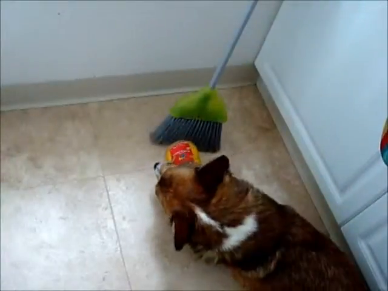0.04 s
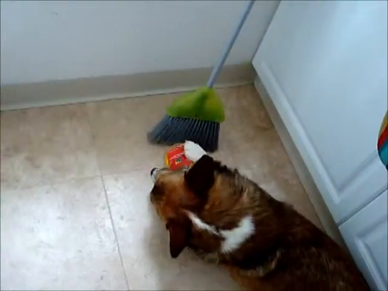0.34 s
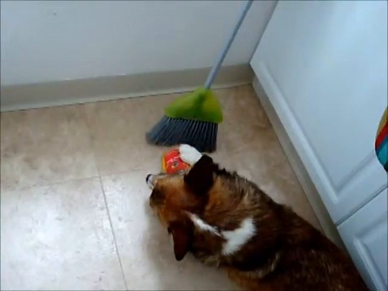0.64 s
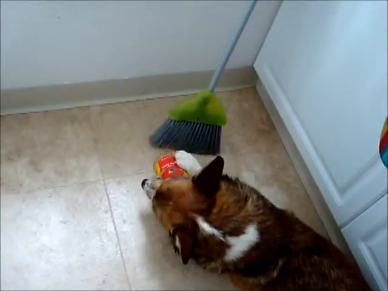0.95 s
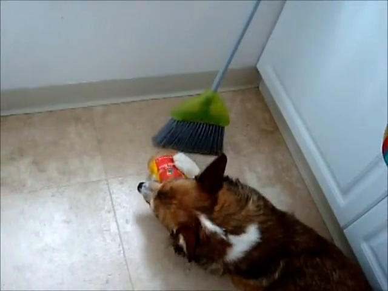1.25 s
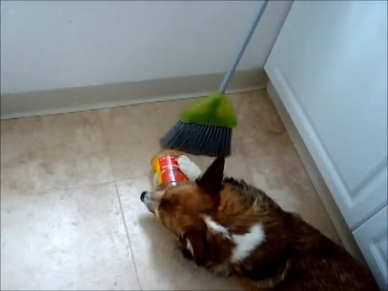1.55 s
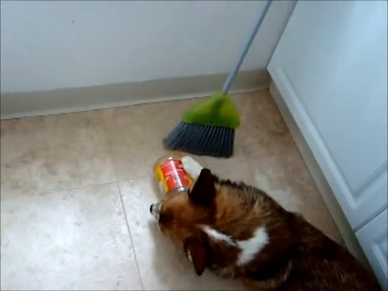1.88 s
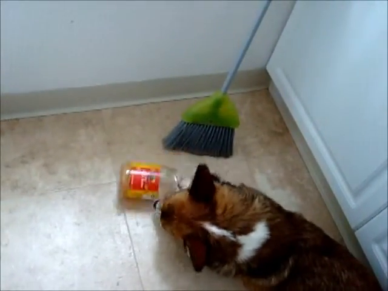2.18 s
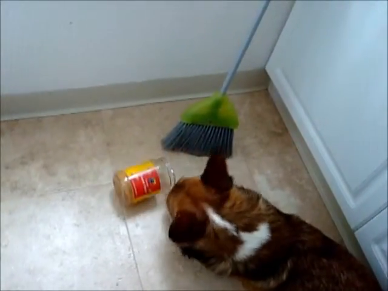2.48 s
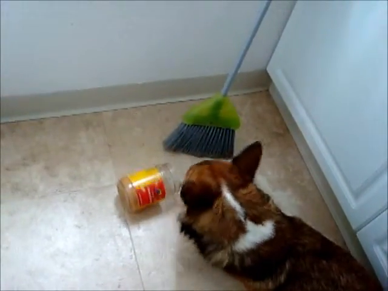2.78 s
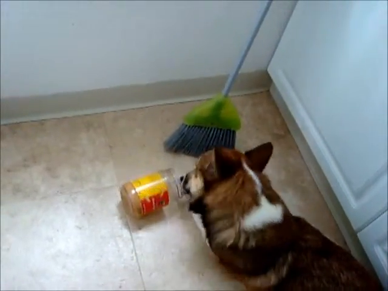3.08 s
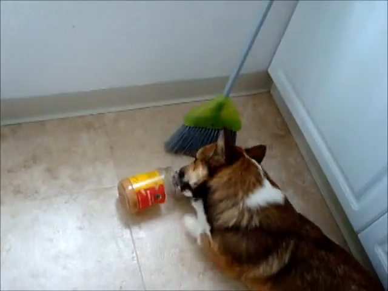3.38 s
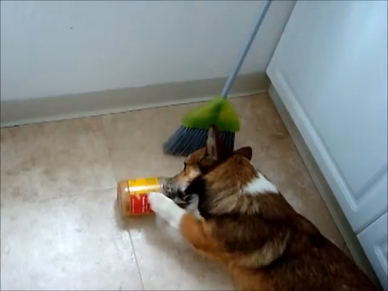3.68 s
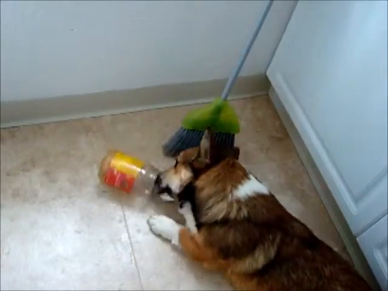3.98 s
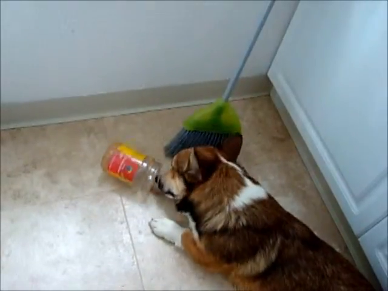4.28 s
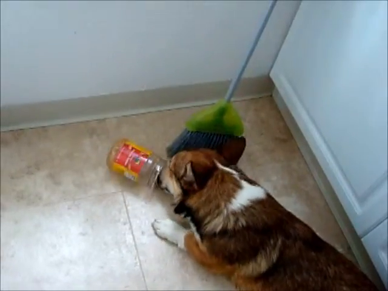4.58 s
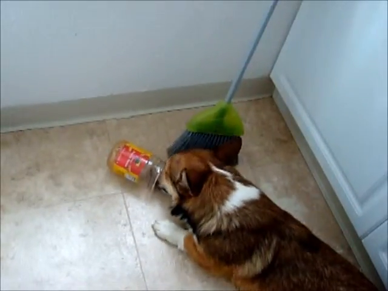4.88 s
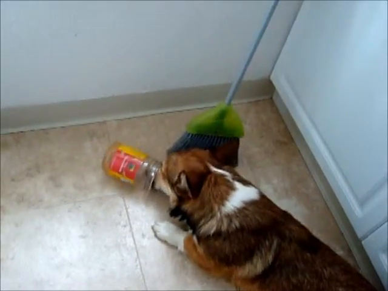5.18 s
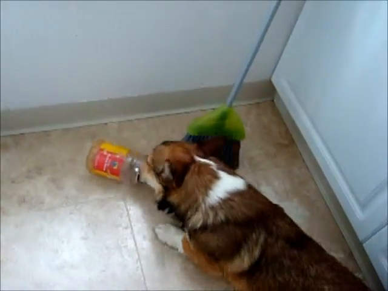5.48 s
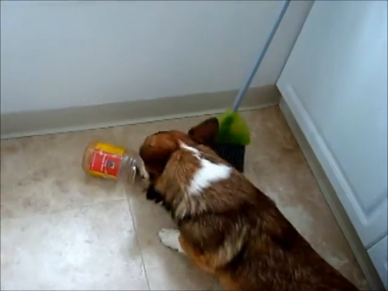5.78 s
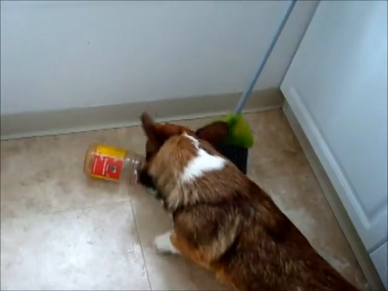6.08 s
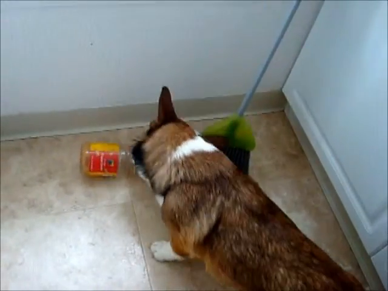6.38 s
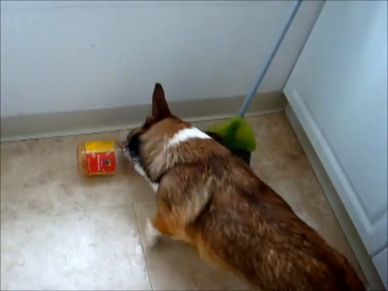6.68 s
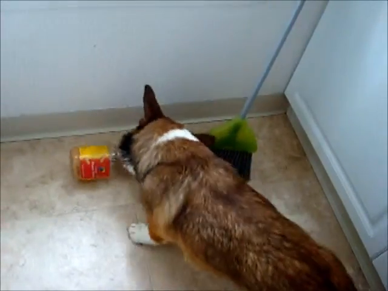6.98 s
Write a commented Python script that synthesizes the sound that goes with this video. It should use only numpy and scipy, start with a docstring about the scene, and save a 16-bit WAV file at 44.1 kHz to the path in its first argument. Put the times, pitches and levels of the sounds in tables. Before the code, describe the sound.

An empty plastic jar clacks lightly and scrapes on a tiled kitchen floor at about 0.3 seconds as a dog works at it. From 1.1 seconds, pinned by a paw, it gives dull, hollow knocks, stronger around 1.5 and loudest at 1.9. It slips free and skitters with sharp clacks and scrapes from 2.1 to 2.4 seconds. After a lull and a faint tick, the muzzle makes two tiny squeaks on the plastic near 3.4 seconds. Another clatter comes between 3.8 and 4.2, with a short roll, then a few soft taps until 5. From about 5.5 seconds to the end at 7, the jar rolls in short nudges with a hollow rumble and low bumps, strongest near 6.8 and mixed with light clacks. One microphone hears it from behind the dog, the small hard room ringing briefly over a faint steady hiss.

```python
"""An empty plastic jar clacks and skitters on a tiled kitchen floor as a dog works at it. Pinned by a
paw, it knocks dully; it slips free, scrapes, squeaks and clacks; then the muzzle closes its mouth and
it rolls with a hollow rumble. Each blow and rub rings the jar's thin wall. One microphone hears it
from behind the dog's body, with the small hard room ringing briefly over a steady hiss."""
import sys
import numpy as np
from scipy import signal
from scipy.fft import rfft, irfft
from scipy.io import wavfile

SR = 44100
rng = np.random.default_rng(int(sys.argv[2]) if len(sys.argv) > 2 else 0)


def put_to_file(sound):
    """Save the sound as 16-bit audio at rate SR, in the file named by the first command-line argument."""
    columns = np.atleast_2d(sound).T  # one column per channel
    safe = np.clip(columns, -1, 1)
    whole_steps = np.round(safe * 32767)
    wavfile.write(sys.argv[1], SR, whole_steps.astype(np.int16))


N = 310905


def free_jar():
    """The loose jar scrapes, squeaks and clacks against claws, teeth and tile."""
    # Hard hits. Each row: start in seconds, relative level in dB, brightness in dB per octave,
    # contact time in seconds, tone of the struck spot in Hz, its gain in dB.
    clacks = [(.2905, -1, -3, 0.0062, 1010, 5), (.327, -8, -1, 0.0069, 2740, 8),
              (.372, -12.5, 4.5, .004, 3100, -4), (.4165, -1.5, -2, 0.0067, 4630, 6),
              (2.138, 2.5, -1.5, 0.0036, 1010, 4), (2.15, 4.5, -1, 0.0098, 1020, 8),
              (2.164, 6, -1.5, 0.0053, 4940, 5), (2.202, 14, 2.94, 0.0061, 3020, -9),
              (2.219, 3, 1.5, 0.0027, 4205, -2), (2.247, 3, -3.5, 0.0016, 4800, 4),
              (3.107, -19, -3.5, 0.0014, 1120, 10), (3.826, -8, -3, 0.003, 2360, 9),
              (3.86, -8, -2, .004, 2360, 1), (3.875, -8.5, -1.5, .0055, 1030, 6),
              (3.924, -6, -2.7, 0.0022, 2180, 14), (3.951, 2.5, 0.5, 0.0039, 4430, 9),
              (3.983, 6, 3.5, 0.0043, 3030, -12), (3.993, 0, -0.5, 0.018, 3470, 7),
              (4.174, -5.5, -4, 0.0089, 2350, -9), (4.483, -9.5, -7, 0.0019, 1210, 10),
              (4.554, -15.5, -2, 0.0019, 960, 7), (4.958, -18.5, -3.5, 0.0036, 1950, 12),
              (5.737, -10.5, -1, 0.0031, 3500, -3), (6.236, -17, 3, .0049, 4700, 0),
              (6.645, -14, 3, 0.0023, 2220, -6), (6.702, -5, -5.5, 0.0021, 1160, 2),
              (6.735, -11.5, 1.5, 0.0023, 3240, -10), (6.807, -8, -4, 0.0038, 2300, 13),
              (6.927, -4.5, 2.6, 0.0063, 4230, 4.5), (6.957, -3, -2, 0.0028, 990, 10)]
    # Short rasps: slides on the tile and, at 1.922 s, a brief rush of noise just before the loudest knock.
    # Each row: start in seconds, seconds until the fade, relative level in dB, brightness in dB per octave.
    rasps = [(.29, 0.056, -27.5, 0.7), (.36, 0.032, -31.5, 3), (.42, 0.028, -28.5, -0.7),
             (.96, 0.053, -35.5, -2), (1.85, 0.054, -29, 0), (1.922, .015, -17, -3),
             (2.05, 0.068, -33, 0.5), (2.125, 0.083, -22.5, -0.5), (2.22, 0.082, -26.5, 0.5),
             (2.3, 0.073, -32.5, -.5), (3.47, 0.13, -36.5, 0), (3.85, 0.052, -32.5, 2.5),
             (3.905, 0.098, -23, 2.2), (4.03, 0.19, -39.5, 3)]
    # Clacks are light and hard; rasps have little top. Each row: frequency in Hz, gain in dB.
    clack_colour = [(350, -9.5), (1000, 0), (2500, 0.5), (6200, -7.5)]
    rasp_colour = [(350, 1.5), (1000, -1), (2500, 0.5), (6200, -15)]
    # The loose wall's broad response. Each row: frequency in Hz, gain in dB.
    wall = [(30, -30), (90, -9.5), (200, -2.5), (400, 3.5), (700, 1.5), (1000, 0.5), (1600, -1.5),
            (3000, 1.5), (4800, 2.5), (7500, -0.5), (10000, -9)]
    # Its resonances. Each row: frequency in Hz, width in Hz, gain over the broad response in dB.
    modes = [(960, 68, -3.5), (1080, 49, 0), (2070, 45, -1), (2420, 20, 0), (3080, 16, -9), (3500, 76, -8),
             (4830, 31, -23), (4980, 190, -4.5), (5200, 45, -2), (5680, 120, 3), (6740, 36, 1)]
    clacking = colour(blows(clacks, spot_q=8.3), clack_colour)
    rasping = friction(rasps, rise_s=0.012, fall_s=0.039, catches_per_s=2200, spread_db=1, smooth=0.63)
    force = clacking + squeaks() + undb(-7) * colour(rasping, rasp_colour)
    return kitchen(jar(force, wall, modes), early_db=-10.5, early_s=0.01, tail_db=-6, gap_s=0.0028)


def pinned_jar():
    """The paw tips the jar and knocks it on the tile; it rocks back with a weaker, duller bump."""
    # Knocks on the tile. Each row: start in seconds, relative level in dB, brightness in dB per octave,
    # contact time in seconds, tone of the struck spot in Hz, its gain in dB.
    knocks = [(1.121, -13.5, -1.5, .004, 2500, 4), (1.182, -7, -3, 0.0029, 353, 4),
              (1.21, -5.5, -3, 0.0029, 975, 0), (1.243, -12.5, -1.5, 0.0034, 412, 7),
              (1.413, -1, -1.5, 0.003, 2660, 8), (1.4325, 11, -1.5, 0.00208, 900, 5.5),
              (1.554, 15, -0.56, 0.0035, 924, 6.5), (1.9405, 21, 0, .0017, 2750, 4)]
    # Under the paw a knock is heavy and dull. Each row: frequency in Hz, gain in dB.
    knock_colour = [(100, 4), (200, 5), (350, 1), (1000, -0.5), (2500, 0.5), (6200, -11.5)]
    # The pinned wall's broad response. Each row: frequency in Hz, gain in dB.
    wall = [(30, -34), (90, -27), (180, -16), (280, -3), (400, 1), (620, -4), (1000, 0.5), (2100, 0.5),
            (2900, 3), (4500, 3), (7000, -2), (10000, -13.5)]
    # Its resonances. Each row: frequency in Hz, width in Hz, gain over the broad response in dB.
    modes = [(178, 19, 4.5), (377, 13.5, -0.5), (494, 43, 6.5), (610, 30, -10), (749, 61, 6.5),
             (837, 45, 2.5), (924, 10, 7.5), (970, 28, 8.5), (1143, 27, -2), (1450, 27, -7),
             (1855, 110, -5), (2340, 20, -25), (3440, 90, -8), (3770, 85, -3), (5810, 160, 6.5)]
    lag_s, contact_s, spot_hz, spot_db = 0.012, 0.0032, 392, 8.5
    rebounds = [(start_s + lag_s, db - 10, brightness - 1.5, contact_s, spot_hz, spot_db)
                for start_s, db, brightness, *_ in knocks]
    force = undb(-3.5) * colour(blows(knocks + rebounds, spot_q=12.8), knock_colour)
    return kitchen(jar(force, wall, modes), early_db=-5, early_s=0.024, tail_db=-6.5, gap_s=0.002)


def hollow_jar(contact_s=0.0039):
    """The jar bumps with a hollow tone and, later, rolls with the muzzle closing its mouth."""
    # Soft hollow bumps; the first two are the jar rocking back after knocks. Each row: start in seconds,
    # relative level in dB, brightness in dB per octave, tone of the bumped spot in Hz, its gain in dB.
    bumps = [(1.193, 4.5, 0, 354, 11.5), (1.26, 0, 2, 390, 9), (4.487, 0, 1, 326, 11),
             (4.507, -3.5, -2, 375, 12), (4.975, -10, -2, 251, 22), (5.628, 14, 1, 238, 5),
             (5.937, 7.5, 2, 447, 7.5), (6.021, 16.5, 3, 420, -1), (6.052, 14, 3, 724, -11),
             (6.084, 13.5, 2.5, 437, 6), (6.11, 9.5, .5, 452, 9.5), (6.356, 9.5, 1, 257, 10),
             (6.785, 20, -1.5, 420, 10), (6.792, 16.5, -3, 707, 9), (6.807, 17, -1, 500, 7),
             (6.825, 16.5, 0.5, 372, 7), (6.877, -5.5, 2, 410, 19)]
    # Each nudge rolls the jar a little way. Each row: start in seconds, seconds until the fade,
    # relative level in dB, brightness in dB per octave.
    rolls = [(3.98, 0.14, -21.5, 1), (4.12, .12, -27, -1), (5.45, 0.074, -21.5, 0), (5.53, 0.14, -22, -2.5),
             (5.76, 0.098, -23, -0.8), (5.94, .04, -27, -1.5), (6.02, 0.09, -21, .5),
             (6.24, 0.037, -28.5, 5), (6.36, .07, -28, -0.5), (6.43, .14, -23.5, -0.5),
             (6.59, 0.061, -23.5, 1.8), (6.67, 0.11, -21.5, -1.2), (6.96, 0.098, -25.5, 0.5)]
    # A bump only flexes the jar; rolling also drums the floor. Each row: frequency in Hz, gain in dB.
    bump_colour = [(100, -2.5), (230, 3), (310, 0.5), (400, -1), (1000, -5.5), (2500, -24.5), (6200, -31)]
    roll_colour = [(60, -0.5), (140, 11.5), (210, 9.5), (330, -3), (1000, -5), (2500, -16.5), (6200, -20)]
    # The hollow tone's broad response. Each row: frequency in Hz, gain in dB.
    wall = [(30, -32), (90, -21), (140, -24.5), (200, -15.5), (290, -4), (430, -6), (600, -7), (850, -14.5),
            (1400, -6.5), (2300, -5), (5000, -1), (10000, -16)]
    # Its resonances. Each row: frequency in Hz, width in Hz, gain over the broad response in dB.
    modes = [(230.6, 6.7, 7), (393.8, 14, 3.5), (441, 26, 12), (487.6, 13.5, 2.5), (549, 16, -4.5),
             (725.2, 12.8, 20), (963, 26, 11), (2120, 54, -2), (2215, 26, 10), (2790, 60, 2),
             (3570, 40, -12)]
    soft_hits = [(start_s, db, brightness, contact_s, *spot) for start_s, db, brightness, *spot in bumps]
    bumping = colour(blows(soft_hits, spot_q=8), bump_colour)
    rolling = friction(rolls, rise_s=0.015, fall_s=0.067, catches_per_s=700, spread_db=2.5, smooth=0.52)
    force = undb(-2.5) * bumping + undb(-3) * colour(rolling, roll_colour)
    return kitchen(jar(force, wall, modes), early_db=-8.5, early_s=0.019, tail_db=-11, gap_s=0.001)


def squeaks(slips_per_s=130, width_hz=260):
    """The muzzle sticks and slips on the plastic, ringing one spot of the wall."""
    # Muzzle rubs. Each row: start in seconds, length in seconds, relative level in dB, pitch in Hz.
    rubs = [(3.386, .021, -1.5, 2790), (3.474, .005, 0, 3140)]
    force = np.zeros(N)
    for start_s, length_s, db, hz in rubs:
        for slip_s in np.arange(0, length_s, 1 / slips_per_s):
            push, lead = crack(contact_s=0.0024)
            add(force, undb(db) * resonate(push, hz, width_hz), int((start_s + slip_s) * SR) - lead)
    return force


def jar(force, wall, modes):
    """The thin wall answers at once and its modes ring on."""
    push = colour(force, wall)
    return push + sum(undb(db) * resonate(push, hz, width_hz) for hz, width_hz, db in modes)


def blows(hits, spot_q):
    """Firmness sets the brightness of each blow, and the spot that is hit adds its own short tone."""
    force = np.zeros(N)
    for start_s, db, brightness, contact_s, spot_hz, spot_db in hits:
        push, lead = crack(contact_s)
        push = undb(db) * tilt(push, brightness)
        spot_tone = undb(spot_db) * resonate(push, spot_hz, spot_hz / spot_q)
        add(force, push + spot_tone, int(start_s * SR) - lead)
    return force


def crack(contact_s, size=4096, lead=512):
    """The buckling wall spreads a blow over milliseconds; the touch falls `lead` samples in."""
    age = np.arange(size) / SR / contact_s
    buckling = rng.standard_normal(size) * age * np.exp(-2 * age)
    spectrum = rfft(buckling / np.linalg.norm(buckling))
    evenness = along([(700, 1), (1800, 0.3)], size)  # even in the bass, lumpy above
    push = np.roll(irfft(spectrum / np.abs(spectrum) ** evenness), lead)
    # The force builds up quickly and is over within a few contact times.
    since_touch_s = (np.arange(size) - lead) / SR
    push *= np.interp(since_touch_s, [-0.004, 0, 3 * contact_s, 7 * contact_s], [0, 1, 1, 0])
    return push / np.linalg.norm(push), lead


def friction(strokes, rise_s, fall_s, catches_per_s, spread_db, smooth):
    """Many tiny catches of uneven size over a smoother rub; each stroke rises, holds and fades."""
    sizes = undb(spread_db * np.minimum(rng.exponential(size=N), 3))
    catches = (rng.random(N) < catches_per_s / SR) * rng.choice([-1, 1], N) * sizes
    roughness = unit(unit(catches) + smooth * rng.standard_normal(N))
    force = np.zeros(N)
    for start_s, hold_s, db, brightness in strokes:
        start = int(start_s * SR)
        rub = tilt(roughness[start:start + SR // 2], brightness)
        age_s = np.arange(len(rub)) / SR
        rise = np.minimum(age_s / rise_s, 1)
        fade = np.clip(1 - (age_s - hold_s) / fall_s, 0, 1) ** 2
        add(force, undb(db) * rise * fade * rub, start)
    return force


def resonate(x, hz, width_hz):
    """One resonance with gain 1 at its centre."""
    return signal.lfilter(*signal.iirpeak(hz, hz / width_hz, fs=SR), x)


def tilt(x, db_per_octave, low_hz=350, high_hz=6200):
    """Brighten or dull a contact around the middle of its range."""
    swing_db = db_per_octave * np.log2(high_hz / low_hz) / 2
    return colour(x, [(low_hz, -swing_db), (high_hz, swing_db)])


def colour(x, points):
    """Filter by a smooth curve of (Hz, dB) points."""
    return irfft(rfft(x) * undb(along(points, len(x))), len(x))


def split(x, centres_hz):
    """Overlapping bands that add up to the sound again."""
    spectrum = rfft(x)
    weights = [along(list(zip(centres_hz, row)), len(x)) for row in np.eye(len(centres_hz))]
    return [irfft(spectrum * weight, len(x)) for weight in weights]


def along(points, size):
    """Join (Hz, value) points on a log axis and read them at the bins of a sound of this size."""
    hz, value = np.transpose(points)
    return np.interp(np.log(np.fft.rfftfreq(size, 1 / SR) + 1), np.log(hz), value)


def add(track, sound, start):
    """Mix a sound in from this sample on."""
    track[start:start + len(sound)] += sound[:len(track) - start]


def undb(db):
    """Decibels to gain."""
    return 10 ** (np.asarray(db) / 20)


def unit(x):
    """Scale to rms 1."""
    return x / np.sqrt(np.mean(x ** 2))


def kitchen(x, early_db, early_s, tail_db, gap_s):
    """The microphone gets shaded direct sound, echoes from the near corner, then the room's tail."""
    # The dog's body shades the straight path to the microphone. Each row: frequency in Hz, gain in dB.
    shade = [(500, -2), (3500, 0.5), (6000, -1), (10000, 0)]
    # The room's ring. Each row: frequency in Hz, seconds to fall by 60 dB.
    decay_times = [(150, 0.26), (400, 0.49), (1000, 0.41), (2800, 0.34), (7000, 0.38)]
    centres_hz, t60s = np.transpose(decay_times)
    t = np.arange(SR // 2) / SR
    arrival = np.clip(t / gap_s - 1, 0, 1)
    corner = rng.standard_normal(len(t)) * arrival * np.exp(-(t / early_s) ** 2)
    bands = split(rng.standard_normal(len(t)), centres_hz)
    tail = arrival * sum(band * undb(-60 * t / t60) for band, t60 in zip(bands, t60s))
    echoes = undb(early_db) * corner / np.linalg.norm(corner)
    echoes += undb(tail_db) * tail / np.linalg.norm(tail)
    return colour(x, shade) + signal.fftconvolve(x, echoes)[:N]


def background():
    """Steady hiss behind the jar, with two faint whines high up."""
    # The hiss is fullest in the low middle. Each row: frequency in Hz, relative level in dB.
    hiss_colour = [(15, -52), (25, -33), (90, -12.5), (227, -2.5), (271, -1.5), (394, -1), (436, -0.5),
                   (506, -0.5), (1450, -6.5), (2340, -9.5), (3160, -11.5), (3400, -12), (7220, -17),
                   (7780, -18.5), (10000, -19.5), (13000, -94), (22000, -120)]
    hiss = undb(-50.5) * unit(colour(rng.standard_normal(N), hiss_colour))
    return hiss + undb(-65) * whine(hz=7585, width_hz=40) + undb(-73) * whine(hz=7880, width_hz=35)


def whine(hz, width_hz):
    """A thin tone of even strength whose pitch jitters."""
    t = np.arange(N) / SR
    jitter = np.sqrt(2 * np.pi * width_hz / SR) * rng.standard_normal(N)
    return unit(np.sin(2 * np.pi * hz * t + np.cumsum(jitter)))


def scene():
    """The jar's knocks, clacks and hollow rolling over the background, at one microphone."""
    return (pinned_jar() + free_jar() + hollow_jar() + background())[None]


def record(dry):
    """The recorder rounds the loudest peaks and cuts the top steeply."""
    ceiling, top_hz = 0.8, 10030
    rounded = ceiling * np.tanh(dry / ceiling)
    return signal.sosfilt(signal.ellip(12, 0.2, 70, top_hz, fs=SR, output="sos"), rounded)


dry = scene()
out = record(dry)
put_to_file(out)
```